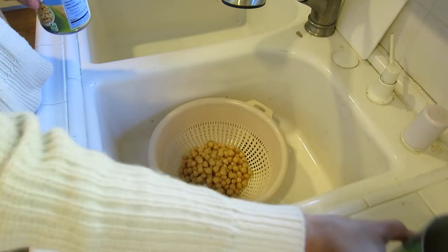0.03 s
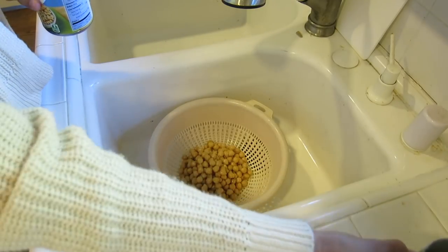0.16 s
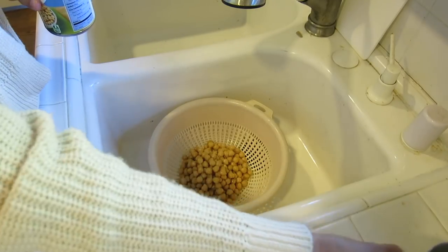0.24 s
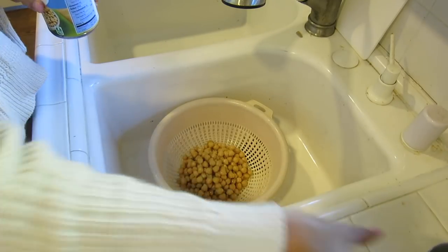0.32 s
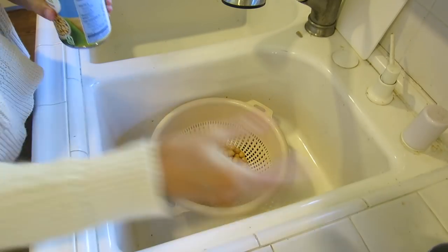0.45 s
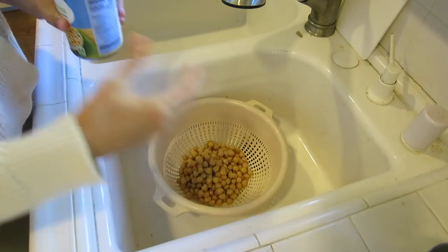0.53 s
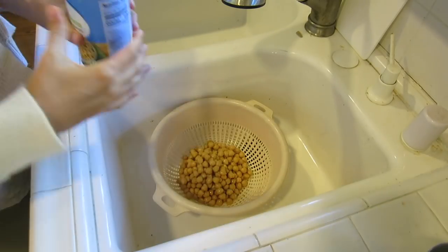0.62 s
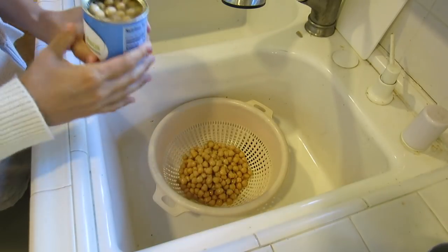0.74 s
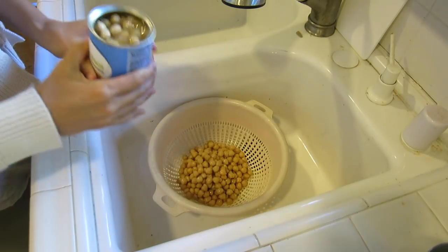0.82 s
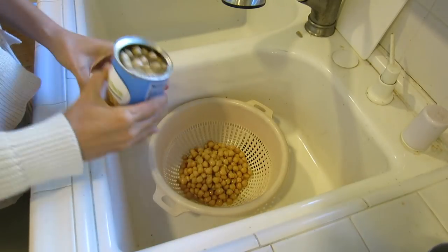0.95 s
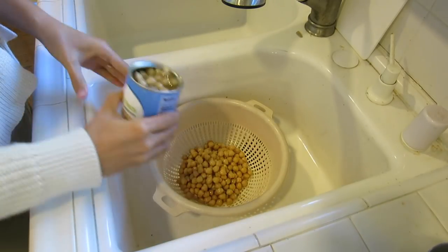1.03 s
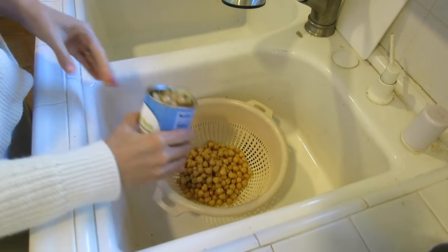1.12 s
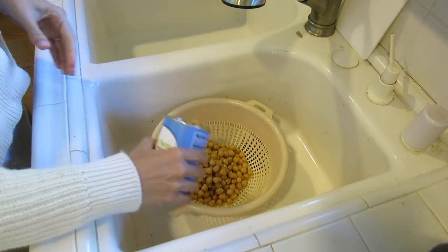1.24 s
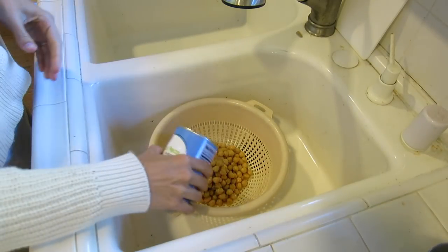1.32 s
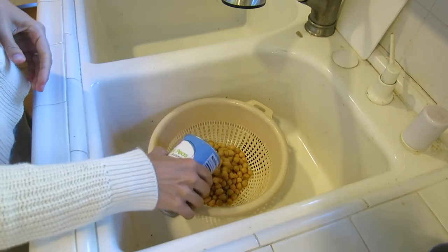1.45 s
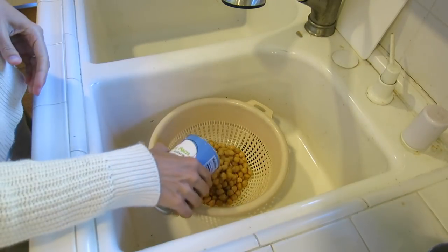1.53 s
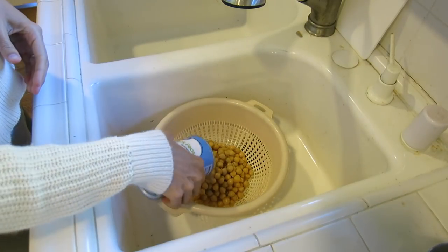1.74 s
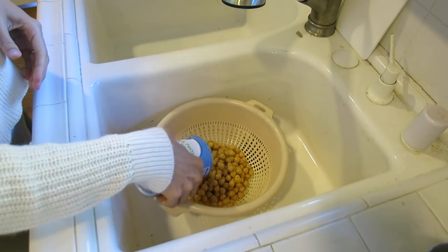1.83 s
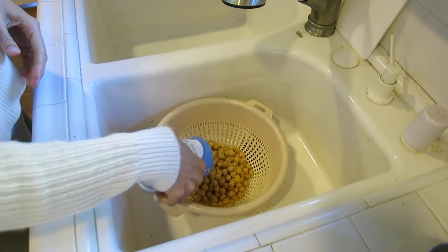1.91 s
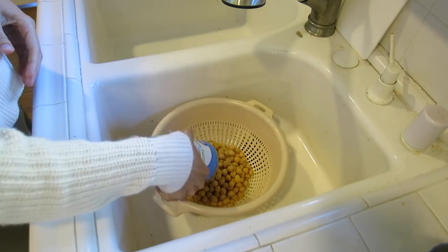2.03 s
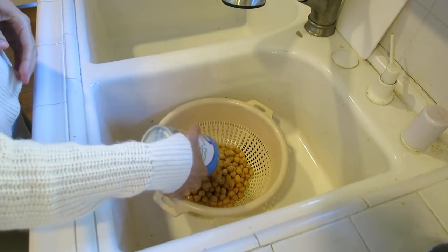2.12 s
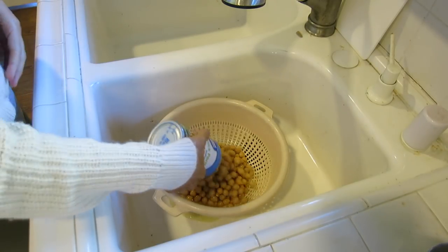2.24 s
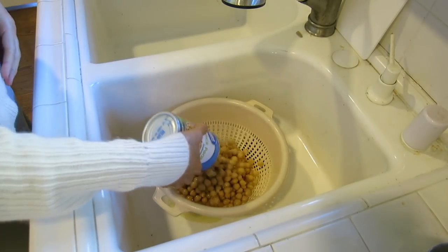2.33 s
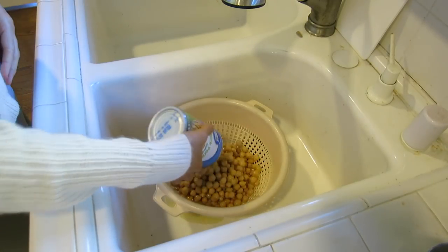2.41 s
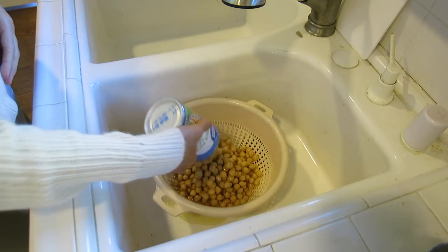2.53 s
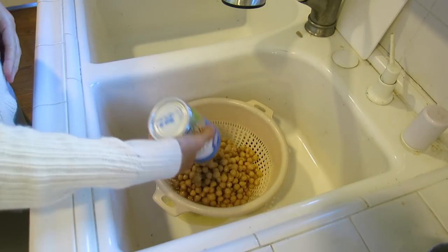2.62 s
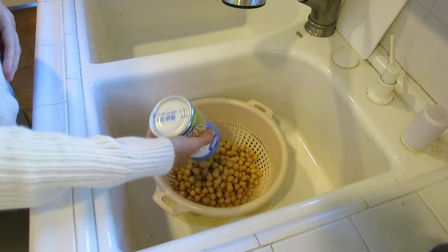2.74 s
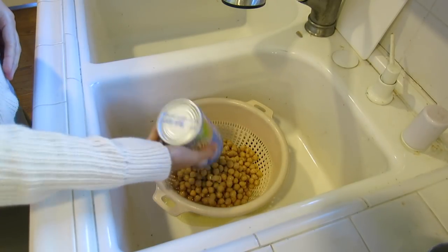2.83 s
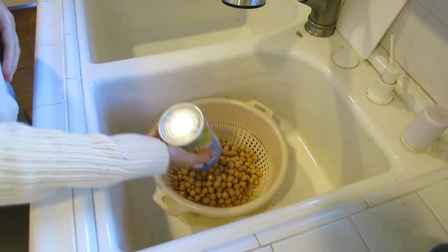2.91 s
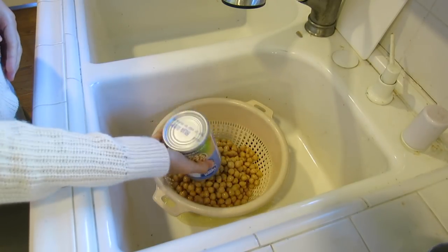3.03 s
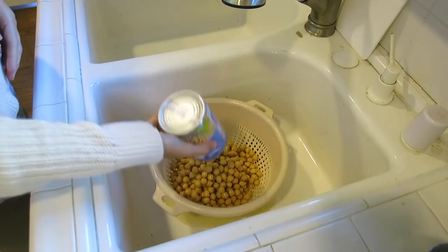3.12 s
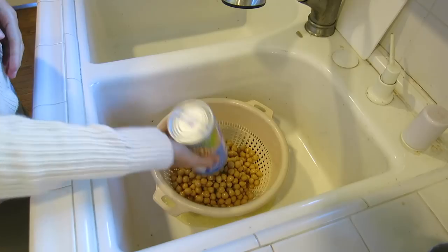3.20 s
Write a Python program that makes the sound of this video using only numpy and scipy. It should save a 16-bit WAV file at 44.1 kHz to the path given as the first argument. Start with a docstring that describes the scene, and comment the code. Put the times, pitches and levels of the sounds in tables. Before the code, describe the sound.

Wet canned chickpeas tipped into a plastic colander, crackling and plopping, after one hard metallic knock

```python
"""At a kitchen sink, a metal tool is put down hard on a tiled counter: cracks of noise over damped modes.
A can of chickpeas is then gripped, brushed, and tipped over a plastic colander: the wet peas crackle as
pitched ticks and tiny bubbles, plop onto the heap as rising damped tones, and tap the plastic as noise bursts.
The shaken can rings hollow as a swelling, gliding sine, and an appliance hums as wavering sines over noise.
The recorder's gain ducks on a loud sound such as the knock and creeps back."""
import sys
import numpy as np
from scipy import signal
from scipy.fft import rfft, irfft
from scipy.io import wavfile
from scipy.ndimage import uniform_filter1d, minimum_filter1d

SR = 44100
rng = np.random.default_rng(int(sys.argv[2]) if len(sys.argv) > 2 else 0)


def materialize(psi):
    """Save the field psi as 16-bit PCM at rate SR to the path in sys.argv[1].

    A 1-D psi becomes a single channel; in a 2-D psi each row is a channel.
    """
    bounded = np.clip(np.atleast_2d(psi).T, -1, 1)
    quanta = np.round(bounded * 32767).astype(np.int16)
    wavfile.write(sys.argv[1], SR, quanta)


N = 143325  # length in samples
T = np.arange(N) / SR  # time in seconds

# Appliance hum, steady partials. Columns: pitch_hz, level_db (before wavering)
HUM_PARTIALS = [(120.2, -46.5), (242.7, -62.5), (214.6, -66), (89.5, -56.5)]
# Spectrum of rumble and hiss. Columns: frequency_hz, relative_db
FLOOR_COLOUR = [(20, -32.5), (45, -2.5), (90, -11), (125, 5), (175, -5), (300, -9.5), (450, -15),
                (1100, -19.5), (3200, -37.5), (5000, -37.5), (11000, -36), (16000, -46.5)]
HUM_WAVER = 0.2  # spread, as a fraction of the amplitude
FLOOR_DB, FLOOR_WIDE_HZ = -48.5, 250  # level; corner below which the two ears agree

# Hand gripping the can. Columns: start_s, bright_level_db, dull_thud_level_db
GRIPS = [(0.73, -42, -32), (.861, -34.5, -47), (0.975, -22.5, -42), (0.98, -27.5, -60), (1.006, -33, -39)]
# Sleeve and palm rubbing, an envelope. Columns: time_s, level_db (before flutter)
RUB_ENVELOPE = [(.72, -55.5), (.8, -66), (.85, -52.5), (.92, -59), (.99, -51.5), (1.05, -65), (1.15, -77.5)]
GRIP_T60_S = 0.022

# Tool on the counter, blow and softer bounces. Columns: start_s, relative_db, hardness (0 to 1)
KNOCKS = [(0.2193, -1, 0.71), (0.2218, -19, .1), (.2445, -17.5, 0.14), (0.2539, -15, 0.37)]
# Modes of tool and counter. Columns: pitch_hz, relative_db, t60_s
KNOCK_MODES = [(493, 3, 0.35), (532, 8, 0.28), (575, 5, 0.24), (671, -7.5, 0.42), (951, -8, 0.48),
               (1110, -15, .5), (1273, -3, 0.38), (1346, -1.5, 0.43), (1382, -8.5, 0.59), (1700, -16, 0.25),
               (2230, -7.5, 0.33), (2290, -12, 0.55), (2880, -12.5, 0.32), (4480, -15, 0.35),
               (5370, -19, 0.22), (5510, -18, 0.42), (5550, -23.5, 0.59), (6895, 3, 0.058)]
# Spectrum of the contact crack. Columns: frequency_hz, relative_db
CRACK_COLOUR = [(100, -45), (300, -15.5), (540, 8.5), (800, -1.5), (1250, 2.5), (2400, -1), (3000, -11.5),
                (4000, -18), (5330, -5.5), (6170, -16), (7010, -9.5), (10600, -12.5), (11900, -6.5),
                (13500, -12), (16000, -25)]
CRACK_DB, CRACK_T60_S, RING_DB = 18.5, 0.01, -14.5
RING_SPREAD_RAD = 0.25  # phase lead at one ear and equal lag at the other
KNOCK_PAN_DB, KNOCK_ROOM_DB = -3, -11
SOFT_CONTACT_S = 0.00071  # rise time of a soft contact

# Gulps and shakes that set the air in the can ringing. Columns: start_s, hold_s, level_db (before waver)
SHAKES = [(2.312, .02, -39.5), (2.372, 0.011, -31.5), (2.514, 0.0063, -32), (2.563, 0.014, -24.5),
          (2.593, 0.11, -31), (2.749, 0.0088, -28.5), (2.78, 0.028, -24), (2.945, 0.038, -23.5)]
# Note of the air in the can, mostly rising as it empties. Columns: time_s, pitch_hz (before waver)
CAN_NOTE = [(2.3, 439.6), (2.38, 520), (2.52, 568), (2.58, 561.5), (2.61, 579), (2.72, 574), (2.81, 589.4),
            (2.86, 603.3), (2.94, 586.5), (3.0, 620.3)]
# Peas flicking the metal wall. Columns: start_s, relative_db
WALL_TAPS = [(2.643, -21.5), (2.777, -31), (2.99, -23)]
# Thin ring of that wall. Columns: pitch_hz, relative_db
WALL_MODES = [(2310, -32), (3700, -36.5), (4700, -29.5), (5280, -35), (6020, -32)]
CAN_ATTACK_S, CAN_T60_S, CAN_WALL_T60_S, CAN_PAN_DB = 0.0084, 0.13, 0.15, -1.5
CAN_WAVER_DB, CAN_PITCH_WAVER = 0.7, 0.005  # spreads; the pitch spread is a fraction

# Air sucked in behind the peas. Columns: start_s, length_s, first_hz, last_hz, level_db of each bubble
SQUELCHES = [(1.622, .05, 1110, 2010, -35.5), (1.785, .016, 1610, 1820, -32.5),
             (2.103, .032, 1050, 1480, -35), (2.129, .055, 562, 450, -30)]

# Wet snaps of the brine. Columns: start_s, relative_db, pitch_hz
SNAPS = [(1.074, -25, 9500), (1.2117, -23.5, 10060), (1.2417, -26, 7400), (1.3377, -25, 9800),
         (1.3876, -23.5, 6630), (1.4355, -22, 8930), (1.456, -30, 10800), (1.512, -17.5, 7190),
         (1.572, -27.5, 6600), (1.5883, -25, 8560), (1.6, -25, 9800), (1.6296, -26, 10400),
         (1.664, -32, 4630), (1.6783, -22, 10500), (1.703, -14.5, 9360), (1.808, -28.5, 5220),
         (1.8294, -26, 6140), (1.838, -26.5, 10300), (1.9093, -19, 5570), (1.957, -29, 5460),
         (2.0047, -33, 9900), (2.014, -34, 8450), (2.059, -33, 10300), (2.111, -35, 10200),
         (2.235, -29, 9400), (2.2495, -25, 8900), (2.2956, -26.5, 9300), (2.3064, -35, 10600),
         (2.334, -40, 7900), (2.469, -26.5, 4920), (2.512, -29.5, 9340), (2.607, -22, 7050),
         (2.6415, -19, 8000), (2.8395, -27, 9050), (2.8987, -24, 9900), (2.942, -29, 8330),
         (3.038, -27.5, 8900), (3.146, -29.5, 6940)]
# Spectrum of wet contact. Columns: frequency_hz, relative_db
WET_COLOUR = [(300, -41), (1500, -7), (3500, -14), (5500, -7), (9500, -4), (12000, -1), (16000, -12.5)]
# Peas sliding out, two envelopes. Columns: time_s, crackle_level_db, patter_level_db
SLIDE = [(1.3, -76, -84), (1.366, -49, -77.5), (1.55, -54.5, -55), (1.67, -45.5, -54.5), (1.83, -48, -46.5),
         (1.97, -50.5, -50), (2.11, -47, -45.5), (2.2, -53.5, -45.5), (2.28, -51, -49.5),
         (2.31, -42.5, -37.5), (2.455, -57, -41), (2.535, -56, -39.5), (2.618, -51.5, -42),
         (2.708, -57.5, -48), (2.779, -58.5, -41), (2.89, -68, -56.5), (2.96, -49, -38), (3.059, -66, -60),
         (3.221, -70, -56)]
SNAP_DB, SNAP_T60_S, SNAP_HARDNESS, SNAP_SKIRT_DB = -2.5, 0.017, 0.14, -25.5
SNAP_RING_DB, SNAP_CYCLES = -6.5, 74
CRACKLE_PER_S, CRACKLE_SPREAD_DB, CRACKLE_CYCLES, CRACKLE_RISE = 780, 4.5, 21, 0.06
FIZZ_DB = -6.5  # relative to the crackle
WET_PAN_DB, WET_ROOM_DB, SINK_DB = -0.5, -10, -1.5

# Peas and clumps landing. Columns: start_s, relative_db, starting_pitch_hz
PLOPS = [(1.449, -36, 736), (1.785, -23.5, 1090), (2.104, -28.5, 1090), (2.152, -34, 467),
         (2.173, -31.5, 476), (2.179, -38, 820), (2.205, -30.5, 550), (2.291, -18.5, 990),
         (2.294, -22, 343), (2.343, -23, 1300), (2.358, -10.5, 1217), (2.4183, -17, 964), (2.445, -19, 790),
         (2.451, -22, 1510), (2.4909, -17, 1180), (2.5, -19.5, 1560), (2.317, -24, 430), (2.607, -22, 940),
         (2.64, -25, 940), (2.764, -31, 277), (2.946, -22.5, 836)]
# Spectrum of the heap. Columns: frequency_hz, relative_db
HEAP_COLOUR = [(100, -28.5), (250, -3.5), (380, -4.5), (520, -0.5), (1200, 1.5), (2300, -4), (3200, -19),
               (8000, -43), (16000, -67.5)]
# Peas tapping the colander wall. Columns: start_s, level_db
TAPS = [(2.95, -42), (3.138, -24.5), (3.233, -19)]
# Spectrum of the plastic colander. Columns: frequency_hz, relative_db
COLANDER_COLOUR = [(150, -37), (400, 4), (900, 3.5), (1250, -10), (1620, 12), (1950, 0), (2350, 4),
                   (2800, -19), (4500, -21.5), (12000, -39)]
PATTER_PER_S, PATTER_SPREAD_DB = 560, 2.5
PLOP_DB, PLOP_CYCLES, PLOP_RISE = -2.5, 16.2, 0.13
THUD_DB, THUD_T60_S, THUD_HARDNESS, TAP_T60_S = 0, 0.022, 0.19, 0.036
HEAP_PAN_DB, HEAP_ROOM_DB = -1.5, -8

# Reverberation time of the kitchen. Columns: frequency_hz, t60_s
ROOM_T60 = [(200, 0.83), (1000, 0.59), (2500, 0.59), (6000, 0.41), (14000, 0.27)]
SINK_T60_S = 0.044  # decay of the nearby reflections
# How much of a source's direction each pitch shows. Columns: frequency_hz, gain_db
LEAN = [(200, -14.5), (400, -1), (1300, 2), (2400, 2), (4400, -12.5), (9000, -19)]
# Side gain of the microphone pair. Columns: frequency_hz, gain_db
MIC_WIDTH = [(60, -27), (250, 1), (600, 2.5), (1300, 4.5), (2400, 1.5), (4400, -13), (8000, -10.5),
             (13000, 4.5)]
LIMIT_DB, DETECT_S, DUCK_S, RECOVER_DB_PER_S = -8.5, 0.0013, 0.0015, 9
CLIP_AT, LOW_CUT_HZ, TOP_HZ = 0.85, 52.6, 16300


def undb(db):
    """Decibel law: twenty decibels are a factor of ten in amplitude."""
    return 10 ** (np.asarray(db) / 20)


def unit(x):
    """Normalisation: scale a signal to a root mean square of one."""
    return x / np.sqrt(np.mean(x ** 2))


def fade(t60):
    """Exponential decay: the amplitude falls 60 dB in t60 seconds."""
    return np.exp(-np.minimum(np.log(1000) * T / t60, 60))


def add(track, at, sound):
    """Superposition: mix a sound into a track from a given second."""
    start = int(at * SR)
    part = sound[:max(N - start, 0)]
    track[start:start + len(part)] += part


def equalise(x, points):
    """Linear filtering: weight the spectrum by a (Hz, dB) curve, with no phase shift."""
    hz, db = np.array(points, float).T
    bins = np.log(np.fft.rfftfreq(2 * N, 1 / SR) + 1)
    gain = undb(np.interp(bins, np.log(hz), db))
    return irfft(rfft(x, 2 * N) * gain)[:N]


def pan(x, db):
    """Interaural level difference, weighted by pitch; positive is left, treble stays near the centre."""
    half_difference = (undb(db / 2) - undb(-db / 2)) / 2
    return x + half_difference * equalise(x.mean(axis=0), LEAN) * np.array([[1], [-1]])


def response(points, size=1024):
    """Minimum phase: fold the cepstrum of a (Hz, dB) colour into a causal response of unit energy."""
    hz, db = np.array(points, float).T
    bins = np.log(np.fft.rfftfreq(size, 1 / SR) + 1)
    log_gain = np.interp(bins, np.log(hz), np.log(undb(db)))
    cepstrum = irfft(log_gain)
    cepstrum[1:size // 2] *= 2
    cepstrum[size // 2 + 1:] = 0
    h = irfft(np.exp(rfft(cepstrum)))
    return h / np.linalg.norm(h)


def through(x, h):
    """Convolution: pass a signal through an impulse response, keeping its length."""
    return signal.fftconvolve(x, h)[:len(x)]


def walk(rate):
    """Random modulation: smoothed random steps, rate per second, with a spread of one."""
    k = int(SR / rate)
    steps = np.repeat(rng.standard_normal(N // k + 1), k)
    return unit(uniform_filter1d(steps, k)[:N])


def burst(h, t60, hardness=0, size=4096):
    """Contact excitation: a hard blow puts its energy in one click, a soft one in swelling noise."""
    hard = np.clip(hardness, 0, 1)
    rise = np.minimum(T[:size] / SOFT_CONTACT_S, 1)
    scuff = rng.standard_normal(size) * fade(t60)[:size] * rise
    click = T[:size] == 0
    excitation = np.sqrt(1 - hard) * scuff / np.linalg.norm(scuff) + np.sqrt(hard) * click
    x = through(excitation, h)
    return x / np.linalg.norm(x) * np.sqrt(t60 * SR) / 10


def bubble(hz, cycles, rise, size=3000):
    """Damped oscillation: over so many starting periods it loses 60 dB and climbs by a fraction, rise."""
    age = T[:size] * hz / cycles
    pitch = hz * (1 + rise * np.minimum(age, 1))
    decay = np.exp(-np.log(1000) * np.minimum(age, 10))
    return np.sin(2 * np.pi * np.cumsum(pitch) / SR) * decay


def grains(per_s, spread_db, low_hz, high_hz, cycles, rise):
    """Granular texture: tiny bubbles of random time, pitch and size, scaled to rms one."""
    out = np.zeros(N)
    for at, pitch, chance in rng.random((int(per_s * N / SR), 3)):
        size = undb(spread_db * min(-np.log(1 - chance), 4))
        hz = low_hz * (high_hz / low_hz) ** pitch
        add(out, at * N / SR, size * bubble(hz, cycles, rise, size=1800))
    return unit(out)


def space(x, room_db, sink_db, size=30000):
    """Reverberation: quick reflections off hard walls and a tail, partly decorrelated between the ears."""
    hz, t60 = np.array(ROOM_T60).T
    bins = np.log(np.fft.rfftfreq(size, 1 / SR) + 1)
    shares = [np.interp(bins, np.log(hz), row) for row in np.eye(len(hz))]  # overlapping bands
    common = rng.standard_normal(size)
    ears = []
    for _ in range(2):
        noise = rfft(rng.standard_normal(size) + 0.42 * common[::-1])
        tail = sum(irfft(noise * share) * fade(decay)[:size] for share, decay in zip(shares, t60))
        tail *= np.minimum(T[:size] / 0.014, 1)  # builds up over 14 ms
        near = (common + 0.46 * rng.standard_normal(size)) * fade(SINK_T60_S)[:size]
        near *= T[:size] > 0.0015  # the direct sound comes first
        tail_part = undb(room_db) * tail / np.linalg.norm(tail)
        near_part = undb(sink_db) * near / np.linalg.norm(near)
        ears.append(x + through(x, tail_part + near_part))
    return np.array(ears)


def kitchen():
    """Stationary background: amplitude- and phase-wavering hum over rumble and hiss with common bass."""
    hum = np.zeros(N)
    for hz, db in HUM_PARTIALS:
        waver = 1 + HUM_WAVER * (walk(16) + 1j * walk(37))
        hum += undb(db) * np.sqrt(2) * np.real(waver * np.exp(2j * np.pi * hz * T))
    colour = response(FLOOR_COLOUR, size=8192)
    mid, side = (through(rng.standard_normal(N), colour) for _ in range(2))
    side = signal.sosfilt(signal.butter(1, FLOOR_WIDE_HZ, "high", fs=SR, output="sos"), side)
    return hum + undb(FLOOR_DB) * (mid + side * np.array([[1], [-1]]))


def handling():
    """Friction and soft contact: fluttering noise for a brushing sleeve, short bursts for pats on the can."""
    bright, dull = response(WET_COLOUR), response(HEAP_COLOUR)
    rub_db = np.interp(T, *np.array(RUB_ENVELOPE).T, left=-120, right=-120) + 2 * walk(60.3)
    out = through(rng.standard_normal(N), bright) * undb(rub_db)
    for at, db, thud_db in GRIPS:
        pat = undb(db) * burst(bright, GRIP_T60_S)
        thud = undb(thud_db) * burst(dull, GRIP_T60_S)
        add(out, at, pat + thud)
    return space(out, room_db=-9.0, sink_db=0)


def knock():
    """Impact and modal ringing: each contact cracks, the first excites modes out of step at the two ears."""
    cracks, rings = np.zeros(N), np.zeros((2, N))
    colour = response(CRACK_COLOUR)
    for at, db, hardness in KNOCKS:
        add(cracks, at, undb(db + CRACK_DB) * burst(colour, CRACK_T60_S, hardness))
    at, db, _ = KNOCKS[0]
    for hz, mode_db, t60 in KNOCK_MODES:
        phase = 2 * np.pi * rng.random()
        lead = RING_SPREAD_RAD * rng.choice([-1, 1])
        envelope = undb(db + RING_DB + mode_db) * fade(t60)[:SR]
        for ear, offset in zip(rings, (lead, -lead)):
            add(ear, at, envelope * np.sin(2 * np.pi * hz * T[:SR] + phase + offset))
    return pan(space(cracks, KNOCK_ROOM_DB, sink_db=-10.5) + rings, KNOCK_PAN_DB)


def can():
    """Cavity and wall resonance: a hollow air note, mostly rising as peas leave, and a thin metal ring."""
    swell, wall = np.zeros(N), np.zeros(N)
    for at, hold, db in SHAKES:
        attack = np.minimum(T / CAN_ATTACK_S, 1)
        held_decay = np.interp(T - hold, T, fade(CAN_T60_S))
        add(swell, at, undb(db) * attack * held_decay)
    pitch = np.interp(T, *np.array(CAN_NOTE).T) * (1 + CAN_PITCH_WAVER * walk(70))
    air = swell * undb(CAN_WAVER_DB * walk(90)) * np.sin(2 * np.pi * np.cumsum(pitch) / SR)
    modes = sum(undb(db) * np.sin(2 * np.pi * hz * T[:SR]) for hz, db in WALL_MODES)
    ring = modes * fade(CAN_WALL_T60_S)[:SR]
    for at, db in WALL_TAPS:
        add(wall, at, undb(db) * ring)
    return pan(space(air + wall, room_db=-13, sink_db=-18), CAN_PAN_DB)


def squelch(count=8):
    """Bubble train: air works into the can as quick damped tones whose pitches glide along the run."""
    out = np.zeros(N)
    for at, length, first_hz, last_hz, db in SQUELCHES:
        for along in (np.arange(count) + rng.random(count)) / count:
            hz = first_hz + along * (last_hz - first_hz)
            add(out, at + along * length, undb(db) * bubble(hz, cycles=23, rise=0.068))
    return pan(space(out, HEAP_ROOM_DB, sink_db=-4), HEAP_PAN_DB)


def brine():
    """Film rupture: liquid snapping between sliding peas gives pitched ticks over chirps and fine fizz."""
    times, crackle_db, _ = np.array(SLIDE).T
    chirps = grains(CRACKLE_PER_S, CRACKLE_SPREAD_DB, low_hz=2480, high_hz=14500,
                    cycles=CRACKLE_CYCLES, rise=CRACKLE_RISE)
    fizz = grains(per_s=1230.8, spread_db=5.5, low_hz=2800, high_hz=14300, cycles=2.9, rise=0)
    crackle = unit(through(chirps + undb(FIZZ_DB) * fizz, response(WET_COLOUR)))
    out = crackle * undb(np.interp(T, times, crackle_db, left=-120))
    for at, db, hz in SNAPS:
        band = response([(hz / 4, 2 * SNAP_SKIRT_DB), (hz * 0.69, SNAP_SKIRT_DB), (hz * 0.888, 0),
                         (hz * 1.1, 0), (hz * 2, SNAP_SKIRT_DB)])
        add(out, at, undb(db + SNAP_DB) * burst(band, SNAP_T60_S, SNAP_HARDNESS))
        add(out, at, undb(db + SNAP_RING_DB) * bubble(hz, SNAP_CYCLES, rise=0.076))
    return pan(space(out, WET_ROOM_DB, SINK_DB), WET_PAN_DB)


def peas():
    """Soft impact: clumps thud and plop on the heap, loose peas patter, the last ones tap the plastic."""
    colour = response(HEAP_COLOUR)
    times, _, patter_db = np.array(SLIDE).T
    drops = grains(PATTER_PER_S, PATTER_SPREAD_DB, low_hz=215.4, high_hz=2950, cycles=12, rise=0.25)
    out = unit(through(drops, colour)) * undb(np.interp(T, times, patter_db, left=-120))
    for at, db, hz in PLOPS:
        add(out, at, undb(db + PLOP_DB) * bubble(hz, PLOP_CYCLES, PLOP_RISE))
        add(out, at, undb(db + THUD_DB) * burst(colour, THUD_T60_S, THUD_HARDNESS))
    plastic = response(COLANDER_COLOUR)
    for at, db in TAPS:
        add(out, at, undb(db) * burst(plastic, TAP_T60_S))
    return pan(space(out, HEAP_ROOM_DB, sink_db=-1.0), HEAP_PAN_DB)


def microphones(x):
    """Mid-side stereo: the close pair hears bass and low treble alike, the mids and the top wider."""
    side = equalise((x[0] - x[1]) / 2, MIC_WIDTH)
    return x.mean(axis=0) + side * np.array([[1], [-1]])


def scene():
    """Superposition of every source at the sink."""
    return kitchen() + handling() + knock() + can() + squelch() + brine() + peas()


def record(dry):
    """Gain control: a fast drop on loud sound and slow recovery, then peak clipping and band limiting."""
    memory = np.exp(-1 / (DETECT_S * SR))
    power = signal.lfilter([1 - memory], [1, -memory], np.mean(dry ** 2, axis=0))
    over_db = np.maximum(10 * np.log10(power + 1e-12) - LIMIT_DB, 0)
    recovery_db = RECOVER_DB_PER_S * T
    cut_db = np.maximum.accumulate(over_db + recovery_db) - recovery_db
    window = 2 * int(DUCK_S * SR) + 1  # centred, so the gain starts down just ahead of the peak
    gain = undb(uniform_filter1d(minimum_filter1d(-cut_db, window), window))
    clipped = np.clip(microphones(dry) * gain, -CLIP_AT, CLIP_AT)
    out = signal.sosfilt(signal.butter(2, LOW_CUT_HZ, "high", fs=SR, output="sos"), clipped)
    return signal.sosfilt(signal.ellip(10, 0.2, 90, TOP_HZ, fs=SR, output="sos"), out)


dry = scene()
out = record(dry)
materialize(out)
```